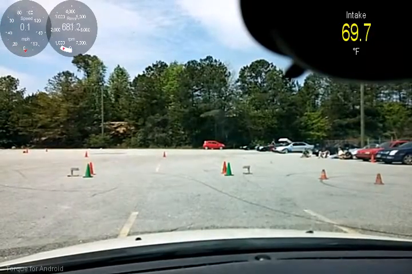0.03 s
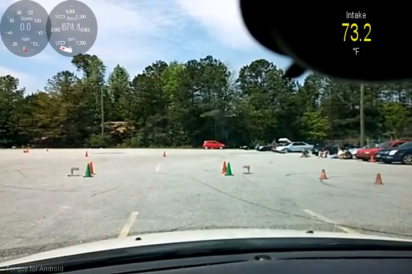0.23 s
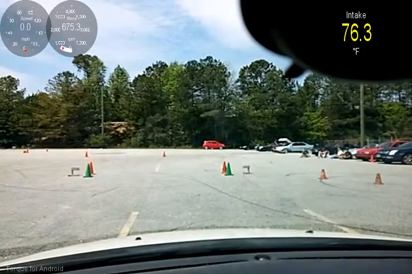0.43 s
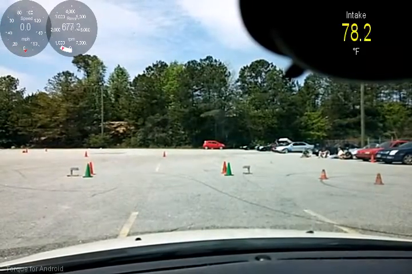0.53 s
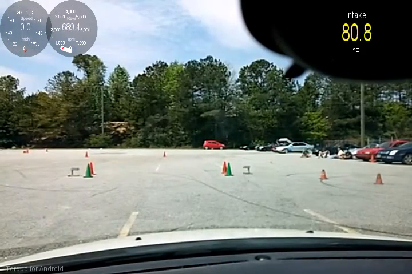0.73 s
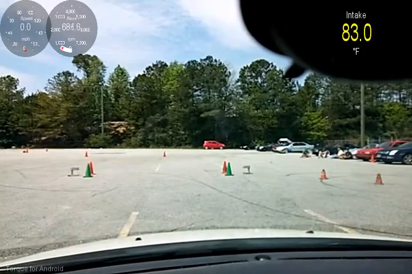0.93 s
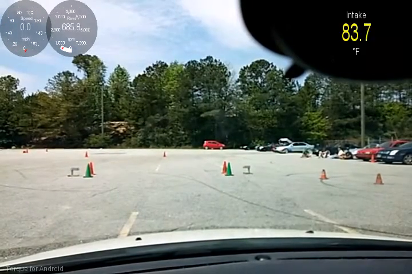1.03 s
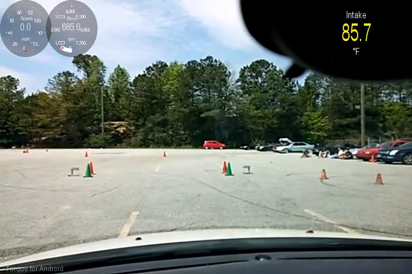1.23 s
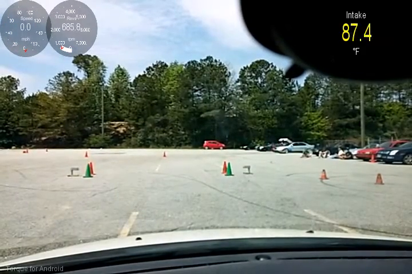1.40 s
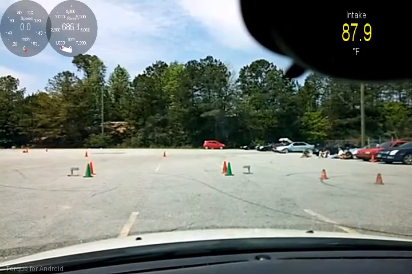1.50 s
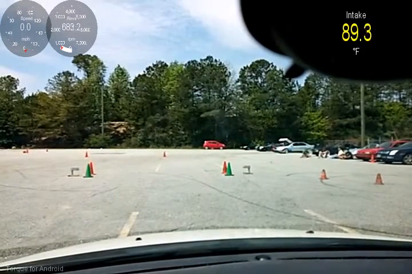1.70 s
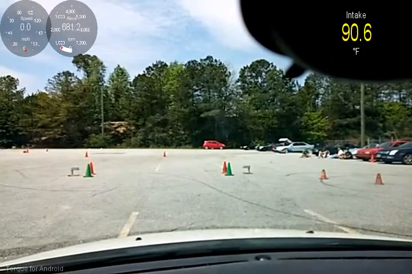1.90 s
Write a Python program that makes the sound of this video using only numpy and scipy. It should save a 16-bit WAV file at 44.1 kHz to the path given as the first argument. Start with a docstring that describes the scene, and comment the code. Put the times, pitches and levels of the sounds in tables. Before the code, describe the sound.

A loud dull thump like something shut in an idling car, then rattling and a knock

```python
"""Throughout, in a parked car, a four-cylinder engine idles: harmonics of the firing rate sum to pulses that
ring the cabin boom, over hums and rumble; shaped noise and a rising exhaust tone are a car pulling away. A
bird, a gliding sine, whistles two rising notes (0.22 s, 0.8 s) among two brief falling ones. From 0.16 s
something is shut: noise rattles, a double thump of low sine bursts, hard plastic modes. Loose parts settle in
bursts of bumps, strongest to 0.5 s and again around 0.7-0.8 s, fading by 0.95 s; a knock of the plastic modes
follows at 0.67 s."""
import sys
import numpy as np
from scipy import signal
from scipy.io import wavfile
from scipy.ndimage import uniform_filter1d

SR = 44100
rng = np.random.default_rng(int(sys.argv[2]) if len(sys.argv) > 2 else 0)


def persist_wave(psi):
    """Save psi, clipped to +-1, as 16-bit WAV."""
    counts = np.round(np.clip(psi, -1, 1) * 32767).astype(np.int16)
    wavfile.write(sys.argv[1], SR, np.atleast_2d(counts).T)


def how_loud(loudness_db):
    """Turn decibels into a plain amplitude multiplier (0 dB gives 1, 20 dB gives 10)."""
    steps = np.asarray(loudness_db, float) / 20
    return 10 ** steps


N = 85995
T = np.arange(N) / SR


def evened(x):
    """Normalization: scales a signal to unit rms."""
    return x / np.sqrt(np.mean(x ** 2) + 1e-20)


def curve(rows, column=1):
    """Linear interpolation: joins one column of a table over the times in its first."""
    rows = np.array(rows)
    return np.interp(T, rows[:, 0], rows[:, column])


def add(mix, start_s, sound):
    """Superposition: sums a sound into the mix from its start."""
    part = mix[round(start_s * SR):][:len(sound)]
    part += sound[:len(part)]


def noise(spectrum, tilt_db=0, patchy_db=0):
    """Spectral shaping: random Fourier frames weighted by (Hz, dB per Hz) points, with patches; rms 1."""
    bin_hz = np.fft.rfftfreq(2048, 1 / SR)
    real, imaginary, patches = rng.standard_normal((N // 512 + 5, 1025, 3)).T
    # smoothed over neighbouring bins and frames
    patches = uniform_filter1d(patches, size=5, axis=0)
    patches = evened(uniform_filter1d(patches, size=5, axis=1))
    hz, db = np.transpose(spectrum)
    db = np.interp(np.log(bin_hz + 1), np.log(hz + 1), db)
    db = db + tilt_db * np.log2(bin_hz / 2000 + 0.0033)  # tilt per octave
    frames = (real + 1j * imaginary) * how_loud(db[:, None] + patchy_db * patches)
    return evened(signal.istft(frames, nperseg=2048, noverlap=1536)[1][:N])


def drift(top_hz):
    """Slow random modulation: sines from 0.4 Hz to top_hz with chance phases, weaker as they rise; rms 1."""
    hz = np.geomspace(.4, top_hz, num=16)
    coarse = T[::64]
    phase = 2 * np.pi * (hz * coarse[:, None] + rng.random(16))
    return evened(np.interp(T, coarse, (np.sin(phase) / np.sqrt(hz)).sum(1)))


def flutter(count, size):
    """Moving average of white noise: quick random modulation, rms about 1."""
    return np.sqrt(size) * uniform_filter1d(rng.standard_normal(count), size=size)


# Firing orders heard in the cabin. Each row: multiple of the firing rate, relative level in dB.
ORDERS = [(1, -28), (2, -3), (3, -8), (4, -13), (5, -8), (6, -9), (7, -2), (8, -2.5), (9, -8), (10, -21),
          (11, -17), (12, -24)]
# Gain of the orders above the fifth. Each row: time in seconds, gain in dB.
UPPER_ORDERS = [(0, -1.5), (.5, 0), (.7, -1), (.95, -5), (1.04, 2.5), (1.15, -4), (1.3, 2.5), (1.5, -4.5),
                (1.7, -2.5), (1.95, 2)]
# Gain of the cabin boom. Each row: time in seconds, gain in dB.
BOOM_GAIN = [(0, 9), (.6, 8), (1.2, 8), (1.5, 12), (1.95, 13)]
# Level of the firing pulses with their boom. Each row: time in seconds, level in dB.
IDLE_LEVEL = [(0, -40), (.15, -39), (.5, -32.5), (.8, -35), (1.05, -33.5), (1.2, -35), (1.5, -34),
              (1.75, -30), (1.95, -33.5)]


def engine():
    """Fourier synthesis: firing orders line up into a pulse per firing, which excites the cabin resonance."""
    firing_hz, first_s = 22.72, .0006
    waver_db, waver_rad, waver_hz = 1.5, .22, 4
    half_db = -15  # unequal cylinders give half orders, set against each whole order
    uneven_db = 1.5  # each firing has its own strength
    boom_hz, boom_width_hz = 107, 10
    turn = 2 * np.pi * firing_hz * (T - first_s)
    pulses = np.zeros(N)
    for k, db in ORDERS:
        db = db + curve(UPPER_ORDERS) * (k > 5)
        level = how_loud(db + waver_db * drift(waver_hz))
        pulses += level * np.cos(k * turn + waver_rad * drift(waver_hz))
        half_level = how_loud(db + half_db + 2 * waver_db * drift(waver_hz))
        pulses += half_level * np.cos((k + .5) * turn + 2 * drift(waver_hz))
    strength_db = uneven_db * rng.standard_normal(50)
    pulses *= how_loud(np.interp(turn / (2 * np.pi), np.arange(50), strength_db))
    boom = signal.lfilter(*signal.iirpeak(boom_hz, boom_hz / boom_width_hz, SR), pulses)
    return how_loud(curve(IDLE_LEVEL)) * evened(pulses + how_loud(curve(BOOM_GAIN)) * boom)


def hums():
    """Amplitude and phase modulation: two sine hums waver in level, the low one in phase too."""
    high = how_loud(-53 + 1.2 * drift(12)) * np.sin(2 * np.pi * 333.4 * T)
    low = how_loud(-43 + 3 * drift(4)) * np.sin(2 * np.pi * 57.5 * T + .6 * drift(3))
    return high + low


# Spectrum of the rumble. Each row: frequency in Hz, relative level in dB per Hz.
RUMBLE_SPECTRUM = [(18, -32), (30, 0), (54, -7.5), (172, 5), (339, -18.5), (383, -20.5), (465, -19.5),
                   (1490, -42.5), (2360, -37.5), (3010, -89.5), (3240, -61.5), (3840, -71.5), (7210, -39),
                   (8760, -49), (9890, -92.5), (12900, -124), (21800, -120)]


def rumble():
    """Stationary coloured noise: a low rumble of steady mean level."""
    return how_loud(-40.5) * noise(RUMBLE_SPECTRUM, patchy_db=0.76)


# Level of the tyre roar. Each row: time in seconds, level in dB.
ROAR_LEVEL = [(0, -66), (.15, -47.5), (.5, -47), (.9, -59), (1.1, -56), (1.2, -49), (1.4, -50.5),
              (1.55, -50), (1.65, -58), (1.95, -53)]
# Spectrum of the tyre roar. Each row: frequency in Hz, relative level in dB per Hz.
ROAR_SPECTRUM = [(200, -28.5), (300, -1), (480, 0), (620, 0), (800, -12.5), (1000, -17), (1200, -26),
                 (2000, -28), (3000, -40), (4500, -69)]
# Level of the brighter roar. Each row: time in seconds, level in dB.
BRIGHT_LEVEL = [(0, -57), (.15, -56), (.8, -64), (1.3, -64.5), (1.45, -56), (1.7, -53.5), (1.85, -53.5),
                (1.95, -57)]
# Spectrum of the brighter roar. Each row: frequency in Hz, relative level in dB per Hz.
BRIGHT_SPECTRUM = [(500, -25.5), (700, -5.5), (860, -2), (1020, -3.5), (1130, -21), (1350, -9.5),
                   (1500, -26), (3000, -27), (4500, -75.5)]
# Far exhaust note. Each row: time in seconds, frequency in Hz, level in dB, level of the overtone at 3/2 in dB.
EXHAUST = [(.7, 268, -62, -75), (1.0, 296, -56, -70), (1.2, 313, -55, -55), (1.5, 328, -58, -58),
           (1.7, 335, -72, -70)]


def distant_car():
    """Broadband and tonal radiation: two bands of roar and a gliding exhaust note with its 3/2 overtone."""
    roar = how_loud(curve(ROAR_LEVEL) + 1.3 * drift(66)) * noise(ROAR_SPECTRUM, patchy_db=3.5)
    bright = how_loud(curve(BRIGHT_LEVEL) + 0.96 * drift(45)) * noise(BRIGHT_SPECTRUM, patchy_db=4.5)
    turn = 2 * np.pi * np.cumsum(curve(EXHAUST)) / SR
    note = how_loud(curve(EXHAUST, column=2)) * np.sin(turn)
    overtone = how_loud(curve(EXHAUST, column=3) + 3 * drift(15)) * np.sin(turn * 3 / 2)
    return roar + bright + note + overtone


# Level of the treble rustle. Each row: time in seconds, level in dB.
RUSTLE_LEVEL = [(0, -68.5), (.15, -63), (.23, -56.5), (.38, -54), (.45, -54), (.48, -67.5), (.55, -56.5),
                (.62, -66.5), (.67, -47.5), (.75, -67), (.83, -70.5), (.87, -60.5), (.9, -70), (1.2, -71.5),
                (1.95, -72)]
# Spectrum of the rustle. Each row: frequency in Hz, relative level in dB per Hz.
RUSTLE_SPECTRUM = [(1470, -15), (2500, -17.5), (2960, -18.5), (4250, -11.5), (7810, -9), (9500, -32),
                   (12400, -82.5), (20900, -120)]


def rustle():
    """Envelope modulation: patchy treble noise swells and fades."""
    return how_loud(curve(RUSTLE_LEVEL)) * noise(RUSTLE_SPECTRUM, patchy_db=3.5)


# Level of loose parts that jostle as they settle. Each row: time in seconds, level in dB.
SETTLE_LEVEL = [(.2, -54.5), (.25, -29), (.33, -37.5), (.375, -41.5), (.4, -32.5), (.44, -20), (.47, -27),
                (.52, -46), (.64, -49.5), (.69, -40.5), (.8, -38.5), (.95, -55.5)]
# Spectrum of the jostling. Each row: frequency in Hz, relative level in dB per Hz.
JOSTLE_SPECTRUM = [(71, -37.5), (120, 4), (348, -8), (480, -23.5), (612, -16), (835, -27), (981, -46.5),
                   (1770, -41), (3000, -45.5), (3900, -76.5), (6600, -120)]


def settling():
    """Poisson process: chance bumps of unequal strength each start a decaying burst of noise."""
    bumps_per_s, t60_s = 180, 0.041
    bumps = rng.random(N) * (rng.random(N) < bumps_per_s / SR)
    decay_t = T[:2000]
    decay = decay_t * how_loud(-60 * decay_t / t60_s)  # grows from zero, then dies away
    bumps = signal.oaconvolve(bumps, decay)[:N]
    return how_loud(curve(SETTLE_LEVEL)) * evened(bumps * noise(JOSTLE_SPECTRUM))


# Bird notes. Each row: length in seconds, first frequency in Hz, last frequency in Hz.
NOTES = [(.06, 2040, 2000), (.19, 2090, 2600), (.235, 1990, 2490), (.022, 3000, 2920)]
# Starts of the notes. Each entry: time in seconds.
BIRD_STARTS = [.1, .22, .8, 1.103]
# Levels of the notes. Each entry: level in dB.
BIRD_LEVELS = [-66, -54, -61, -57]


def bird():
    """Frequency modulation: each whistle is a sine that glides and flutters in pitch and level."""
    out = np.zeros(N)
    for start_s, db, (length_s, from_hz, to_hz) in zip(BIRD_STARTS, BIRD_LEVELS, NOTES):
        u = np.arange(0, length_s, 1 / SR) / length_s
        hz = from_hz + (to_hz - from_hz) * u + 35 * flutter(count=len(u), size=200)
        level = how_loud(db + 3 * flutter(count=len(u), size=500)) * np.sin(np.pi * u ** 1.2)
        add(out, start_s, level * np.sin(2 * np.pi * np.cumsum(hz) / SR))
    return out


# Rattles. Each row: start in seconds, level in dB, rise in seconds, t60 in seconds, tilt in dB per octave.
RATTLE_EVENTS = [(0.163, -29, 0.0022, .05, 2.5), (.169, -21, 0.00053, 0.046, 3.5),
                 (.176, -27, 0.004, 0.088, 3.5), (0.206, -24.5, .002, 0.084, -0.5),
                 (.385, -33.5, 0.0023, .2, 0), (0.67, -28.5, 0.00075, 0.069, -1.5)]
# Spectrum of a rattle before its tilt. Each row: frequency in Hz, relative level in dB per Hz.
RATTLE_SPECTRUM = [(180, -20), (300, -18), (452, -2), (642, 1), (1220, -19.5), (1350, -16.5), (1640, -17.5),
                   (5840, -29.5), (8420, -44), (9890, -55), (12900, -56), (21800, -120)]


def rattles():
    """Exponential decay: bursts of coloured noise rise quickly and die away."""
    out, t = np.zeros(N), T[:SR // 2]
    for start_s, db, rise_s, t60_s, tilt_db in RATTLE_EVENTS:
        envelope = how_loud(db - 60 * t / t60_s) * np.minimum(t / rise_s, 1)
        add(out, start_s, envelope * noise(RATTLE_SPECTRUM, tilt_db)[:len(t)])
    return out


# Low thuds of a panel. Each row: start in seconds, level in dB, frequency in Hz, swell and fade time in seconds.
PANEL_THUDS = [(.1763, -4.5, 146, .007), (.2008, -5.5, 151, .016), (.233, -10, 150, .007),
               (.206, -18, 325, .008), (.205, -17, 95, .025), (.257, -16, 150, .007),
               (.288, -22, 160, .006), (.305, -21, 160, .006), (.24, -26, 64, .04), (.348, -24, 150, .005),
               (.37, -27, 62, .02), (.394, -14, 150, .008), (.4115, -17, 200, .004),
               (.4765, -19, 165, .006), (.683, -24, 65, .03)]


def thuds():
    """Damped panel vibration: each thud is a short sine burst whose envelope peaks after its swell time."""
    out, t = np.zeros(N), T[:SR // 2]
    for start_s, db, hz, swell_s in PANEL_THUDS:
        envelope = t / swell_s * np.exp(.5 - .5 * (t / swell_s) ** 2)
        add(out, start_s, how_loud(db) * envelope * np.sin(2 * np.pi * hz * t))
    return out


# Hard plastic modes. Each row: frequency in Hz, relative level in dB, t60 in seconds.
PLASTIC_MODES = [(353.4, -4.5, 0.17), (579, 2.2, 0.079), (528, -2.5, 0.062), (664, -8.5, 0.055),
                 (786, -19, 0.057), (1117, -13, .03), (1986, -9, 0.021)]
# Hard knocks. Each row: start in seconds, level in dB.
KNOCK_EVENTS = [(.178, -28.5), (.389, -45), (.402, -32), (.42, -36.5), (.6705, -27.5), (.693, -43.5)]


def knocks():
    """Modal synthesis: every knock rings the same set of decaying plastic modes."""
    out, t = np.zeros(N), T[:SR // 2]
    ring = sum(how_loud(db - 60 * t / t60_s) * np.sin(2 * np.pi * hz * t) for hz, db, t60_s in PLASTIC_MODES)
    for start_s, db in KNOCK_EVENTS:
        add(out, start_s, how_loud(db) * ring)
    return out


def scene():
    """Linear superposition: all sources add, in mono."""
    inside = engine() + hums() + rumble() + rustle() + settling() + rattles() + thuds() + knocks()
    outside = distant_car() + bird()
    return (inside + outside)[None]


def low_pass(x):
    """Removes everything above the highest recorded frequency."""
    return signal.sosfilt(signal.butter(12, 10040, fs=SR, output="sos"), x)


def record(dry):
    """Low-pass filtering: the band limit of a phone, 9600 Hz."""
    lowpass = signal.firwin(255, 9600, window=("kaiser", 9), fs=SR)
    mix = signal.oaconvolve(dry, lowpass[None], "same")
    return low_pass(mix)


dry = scene()
out = record(dry)
persist_wave(out)
```